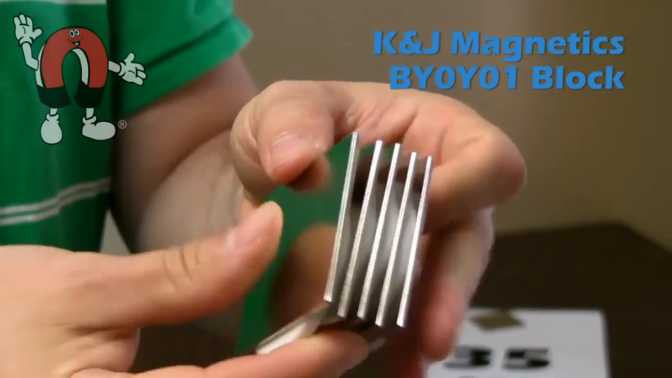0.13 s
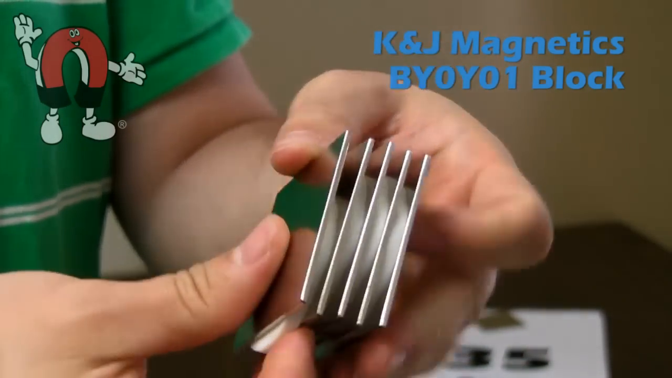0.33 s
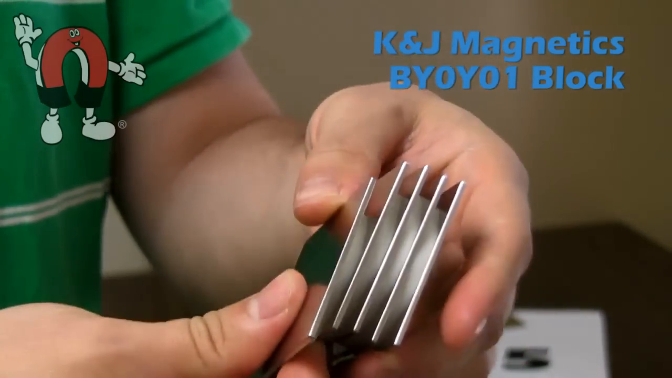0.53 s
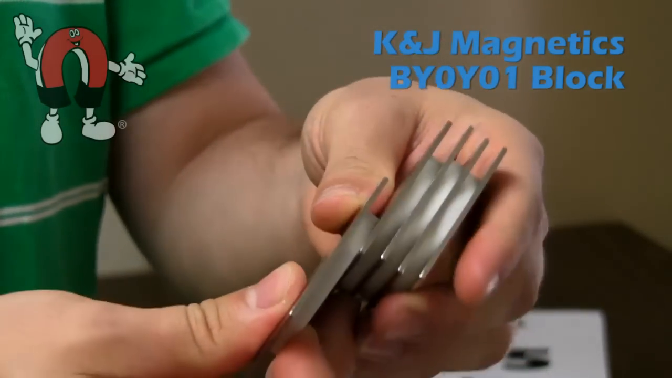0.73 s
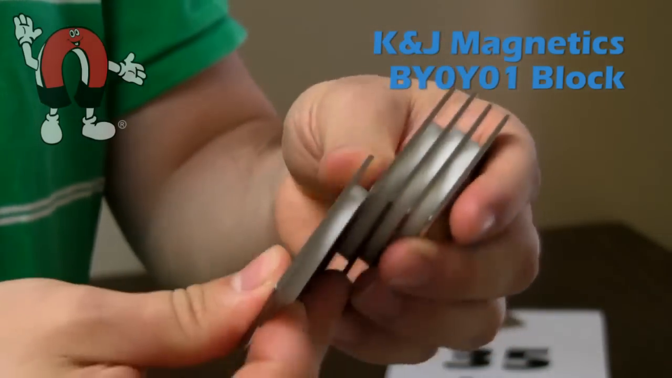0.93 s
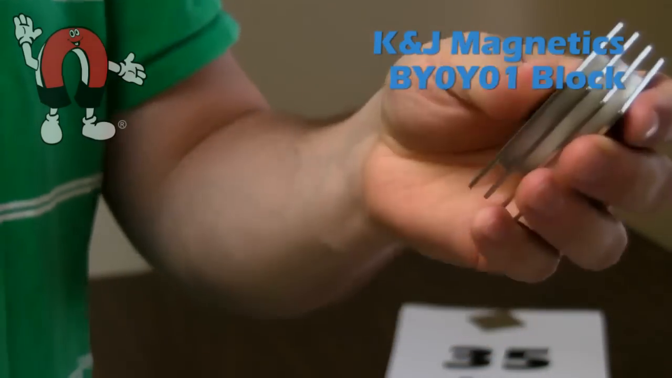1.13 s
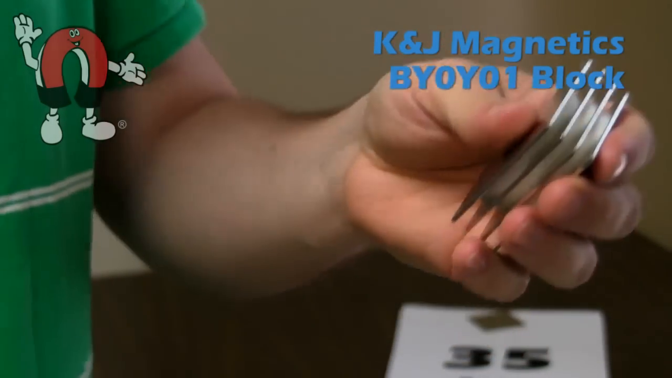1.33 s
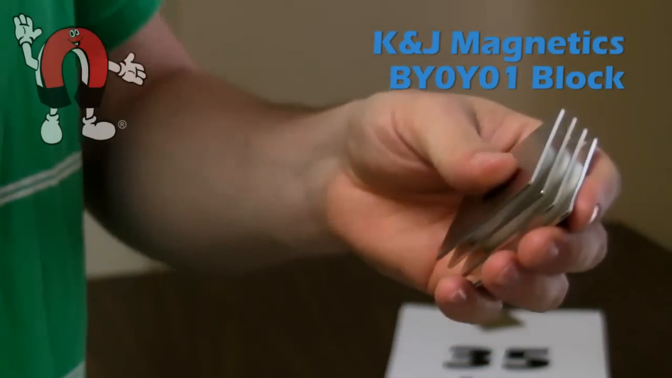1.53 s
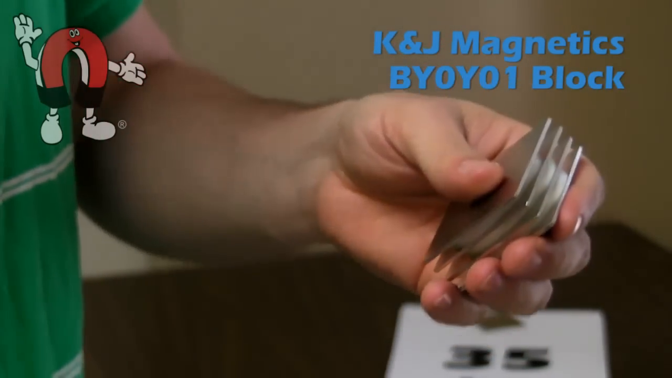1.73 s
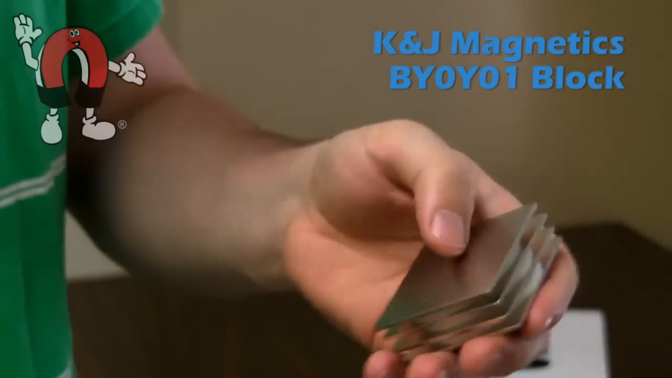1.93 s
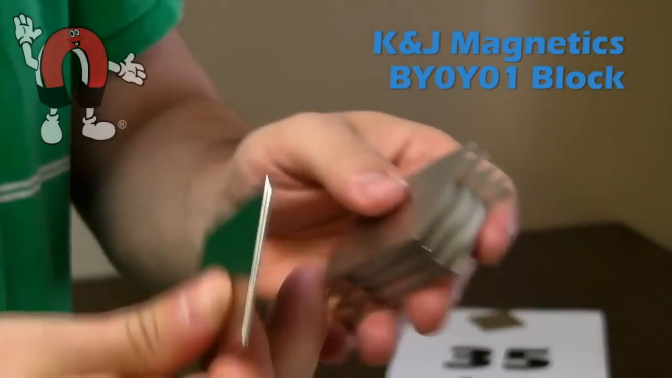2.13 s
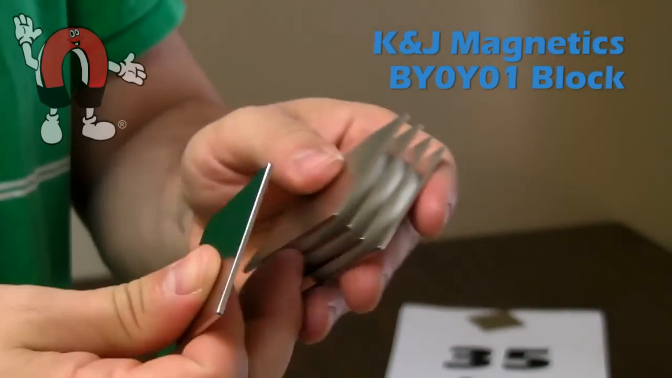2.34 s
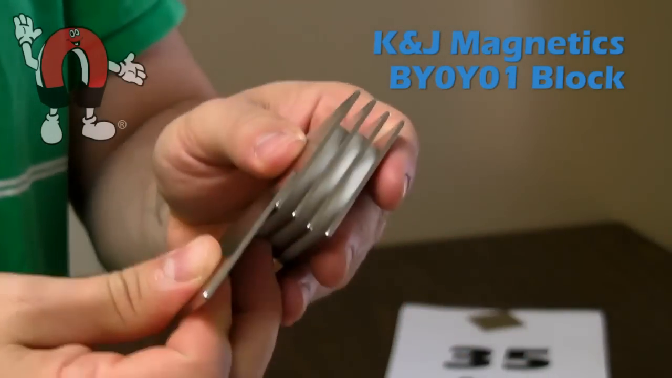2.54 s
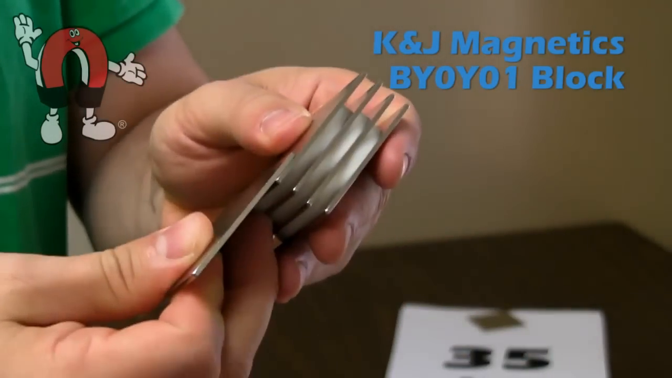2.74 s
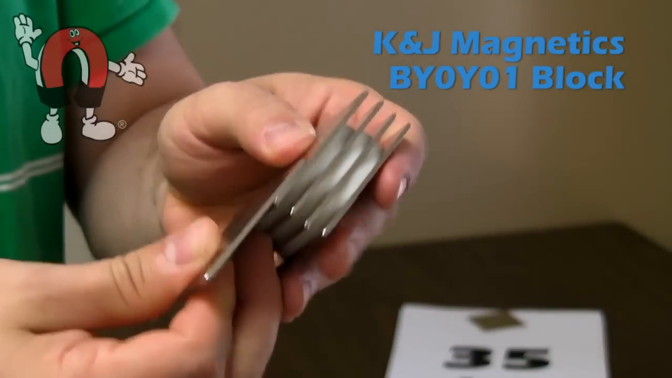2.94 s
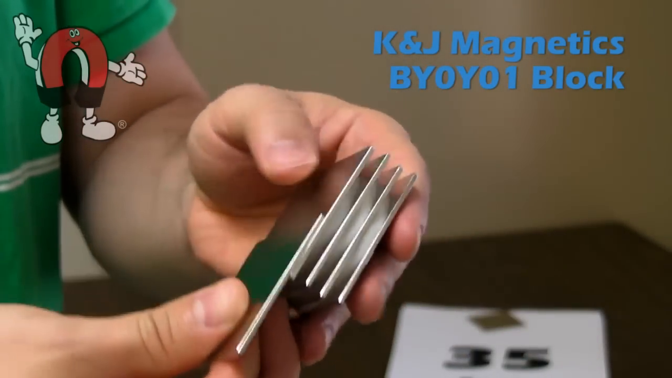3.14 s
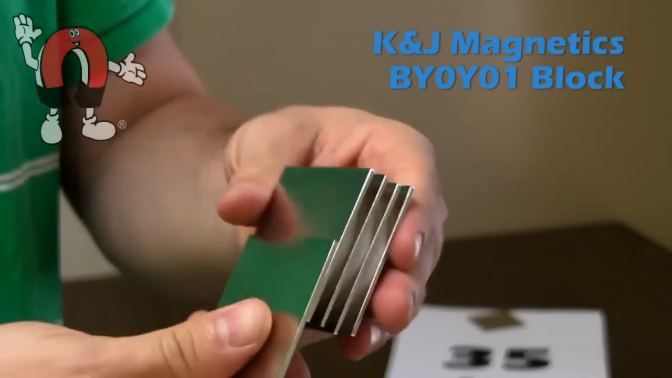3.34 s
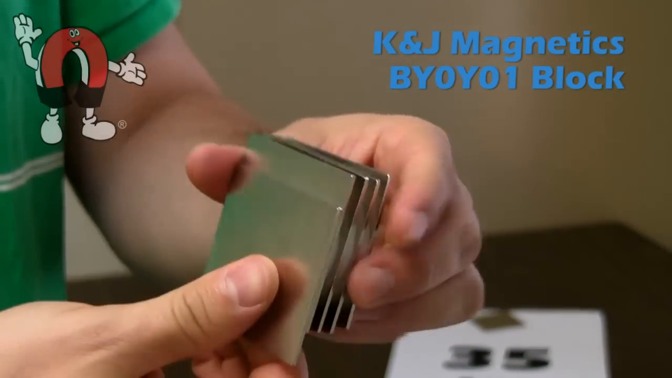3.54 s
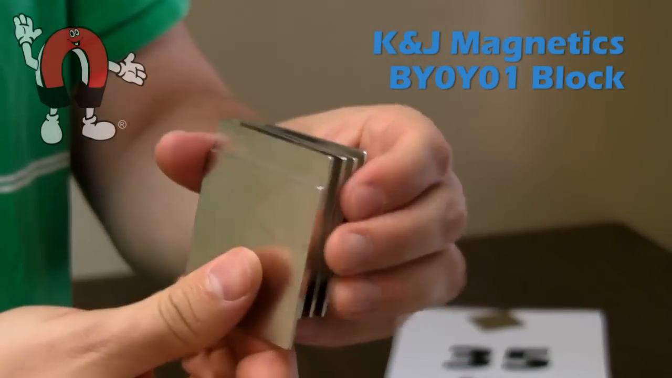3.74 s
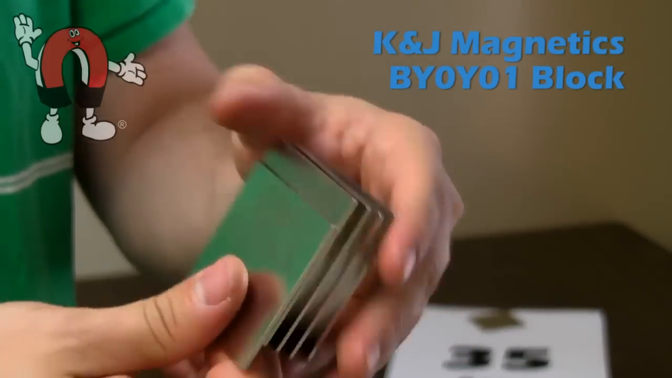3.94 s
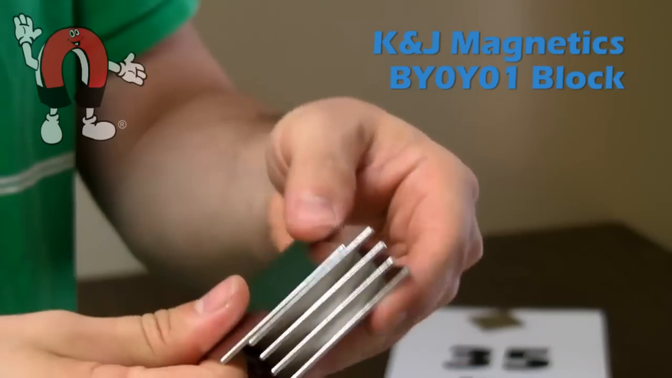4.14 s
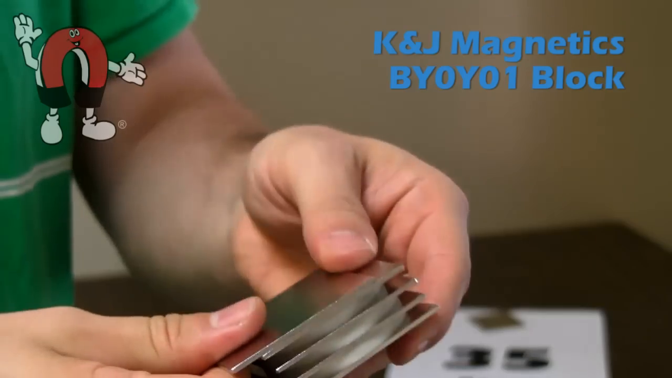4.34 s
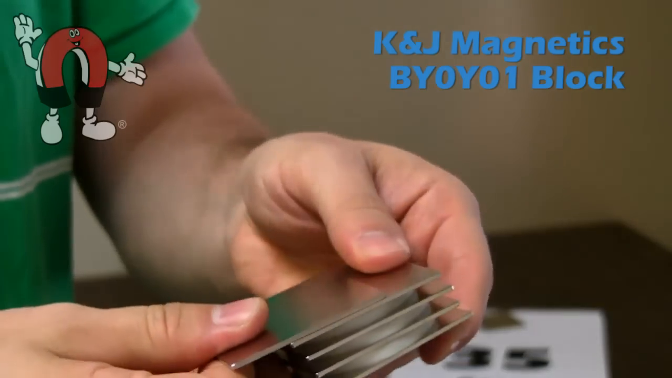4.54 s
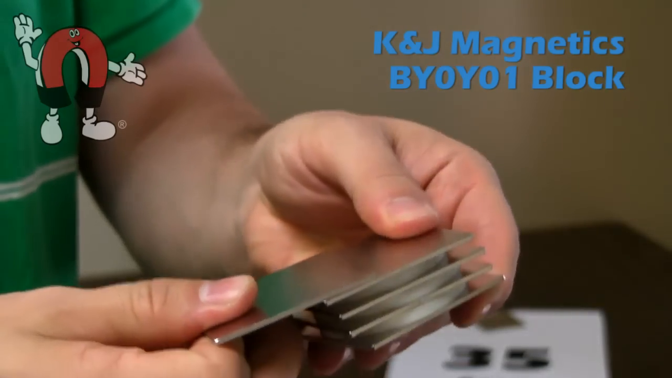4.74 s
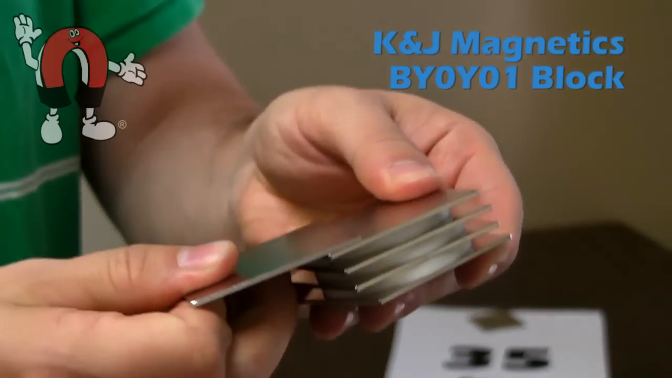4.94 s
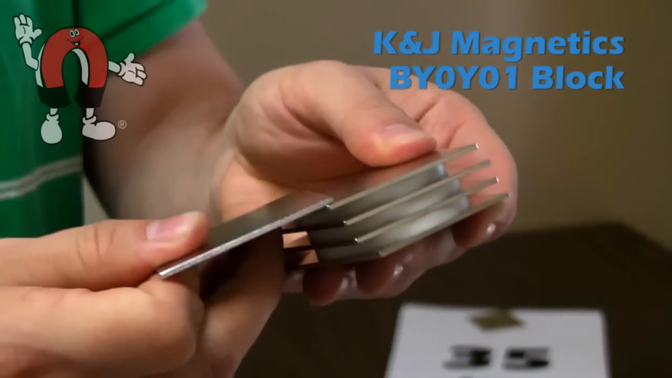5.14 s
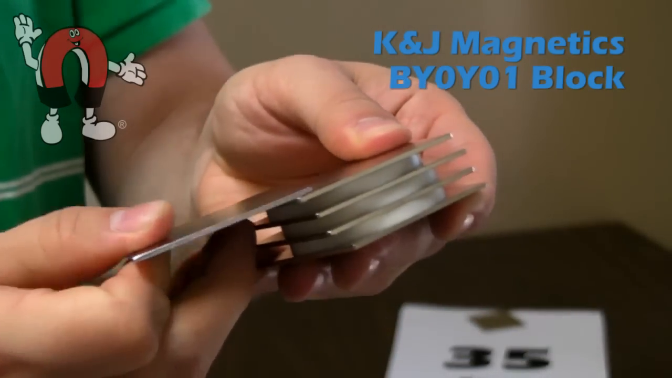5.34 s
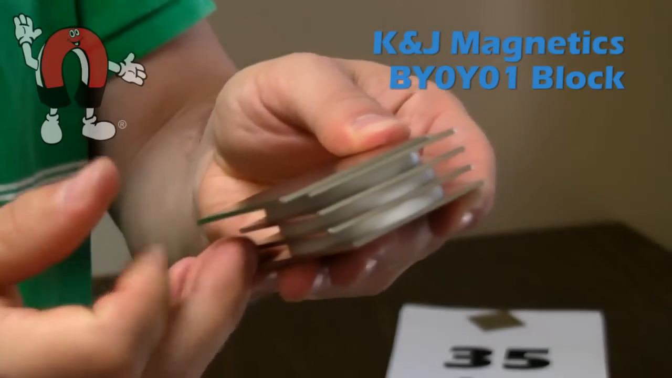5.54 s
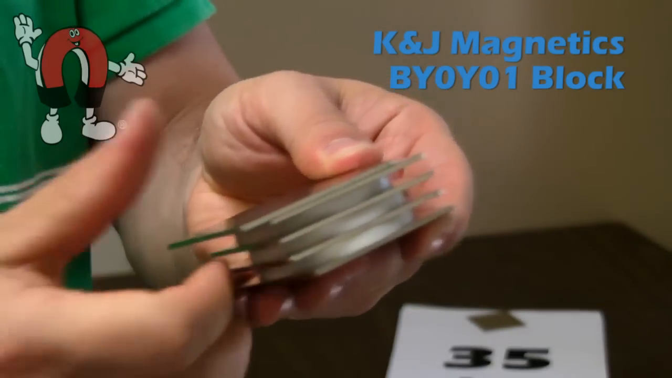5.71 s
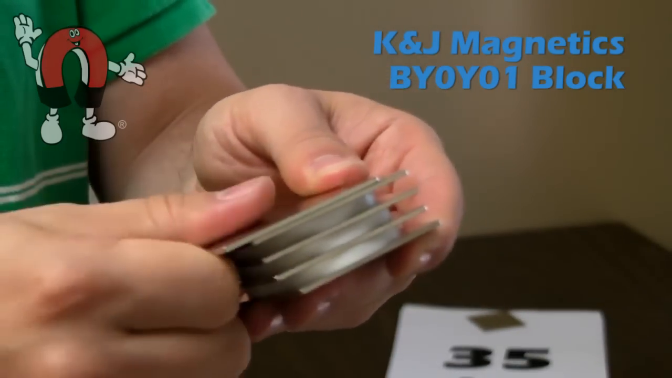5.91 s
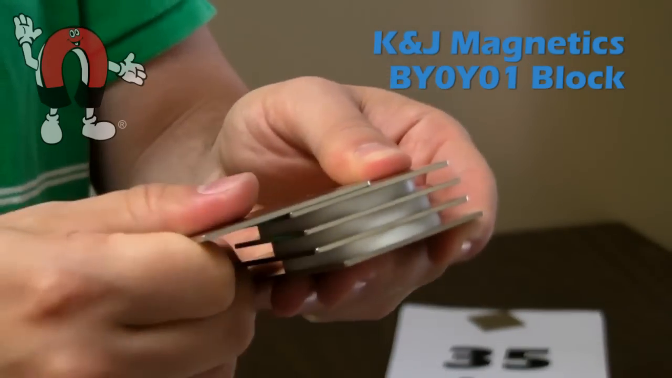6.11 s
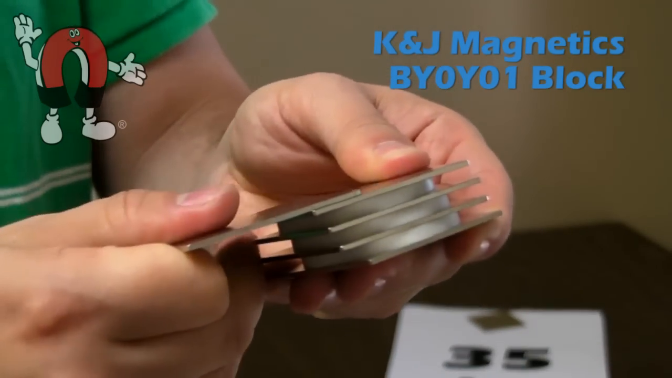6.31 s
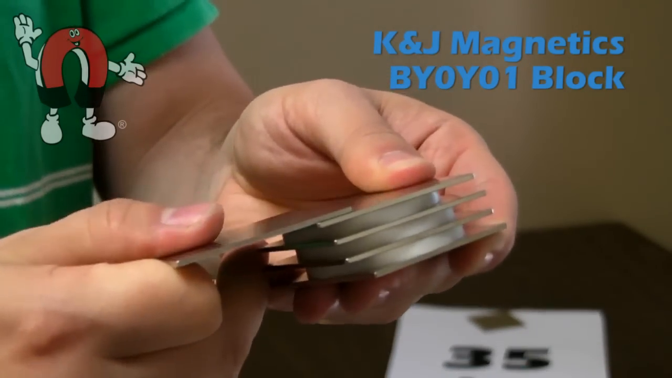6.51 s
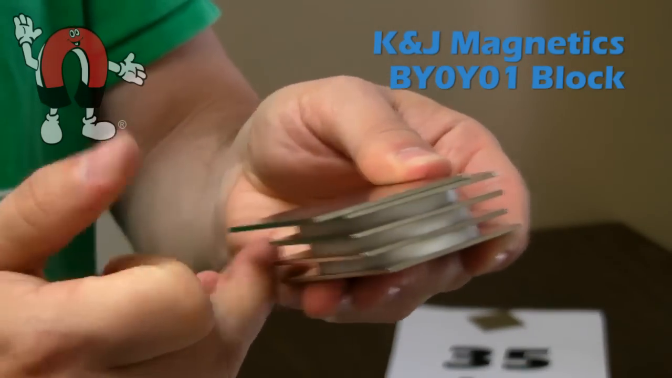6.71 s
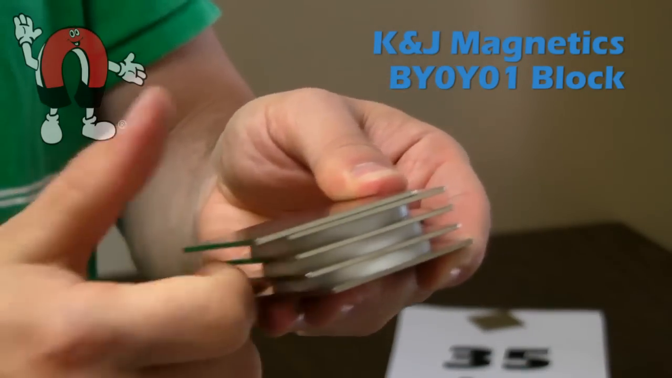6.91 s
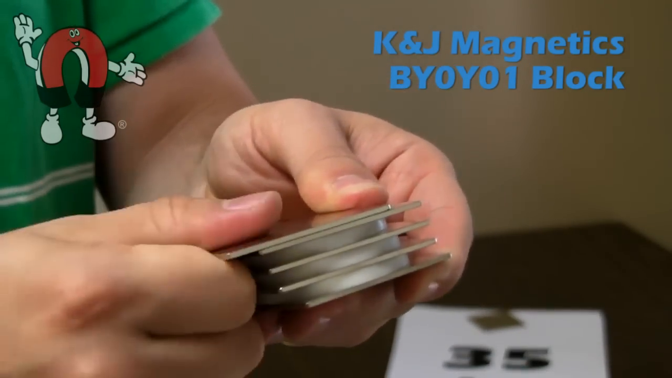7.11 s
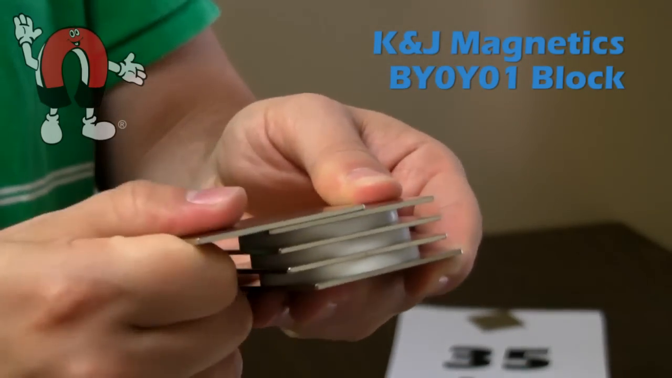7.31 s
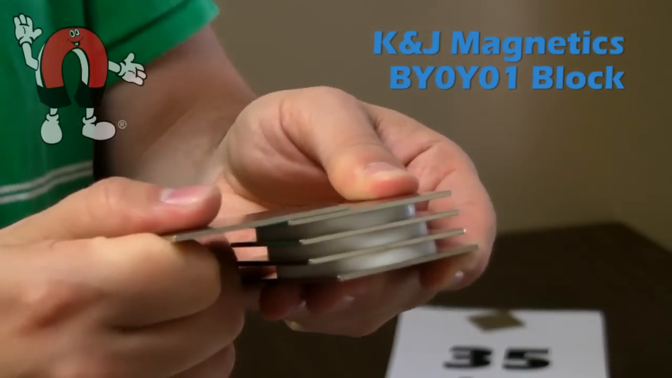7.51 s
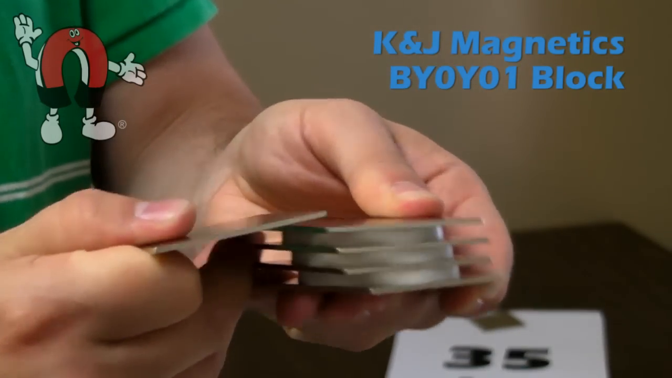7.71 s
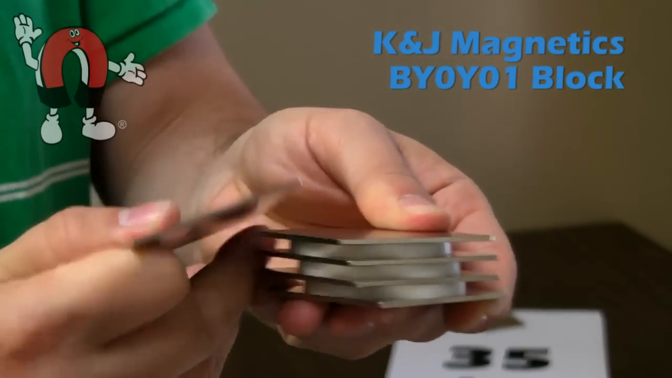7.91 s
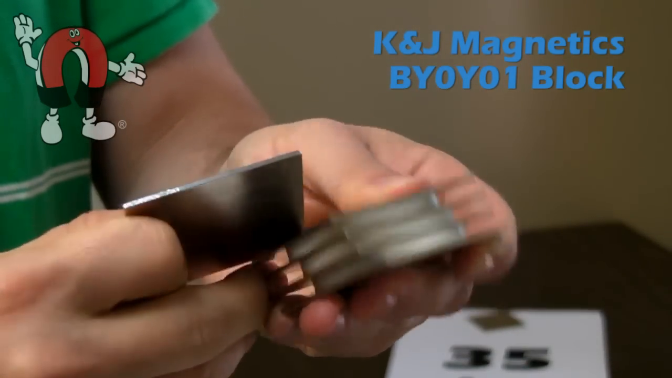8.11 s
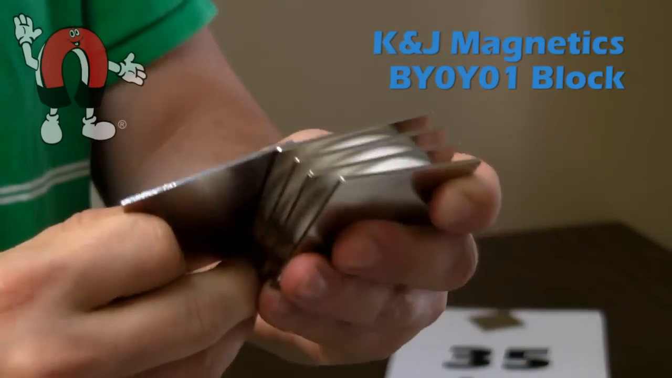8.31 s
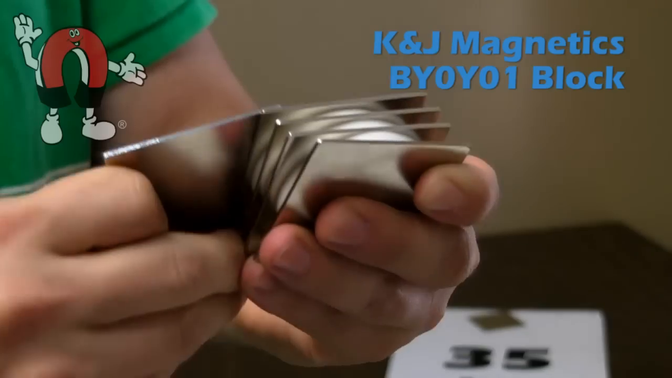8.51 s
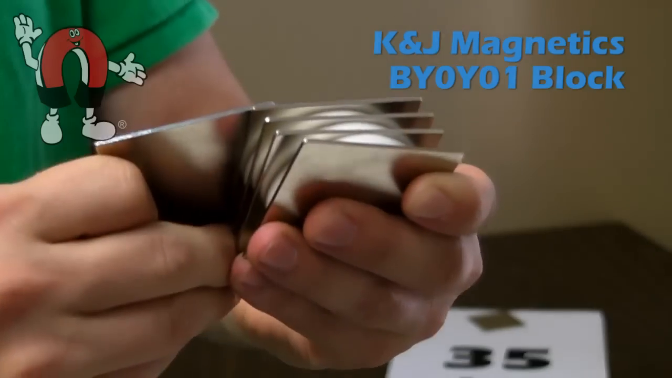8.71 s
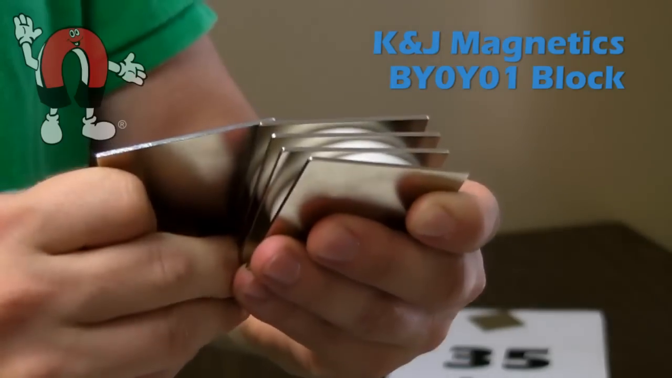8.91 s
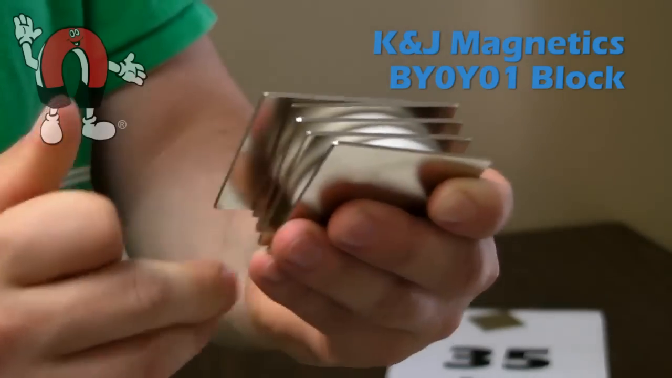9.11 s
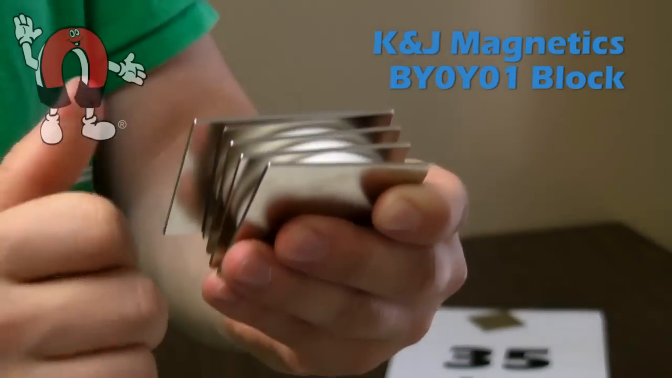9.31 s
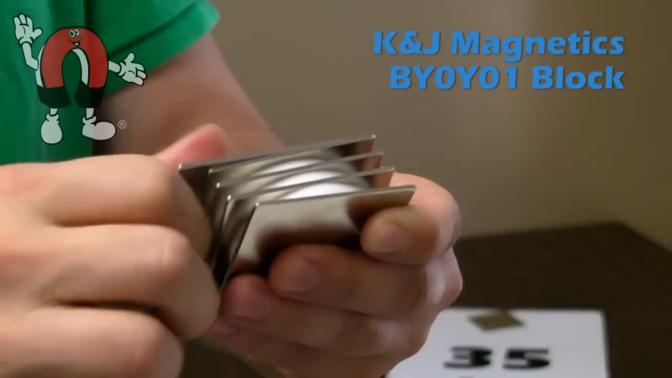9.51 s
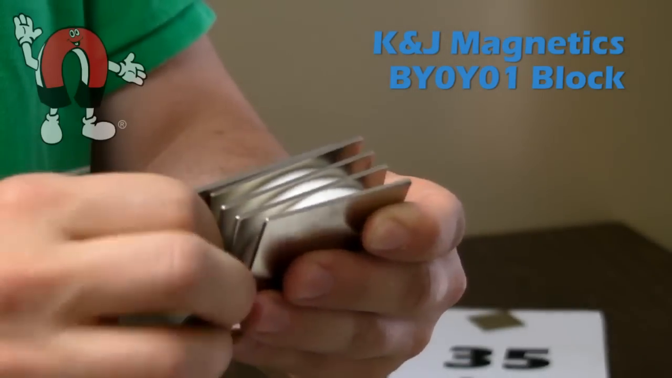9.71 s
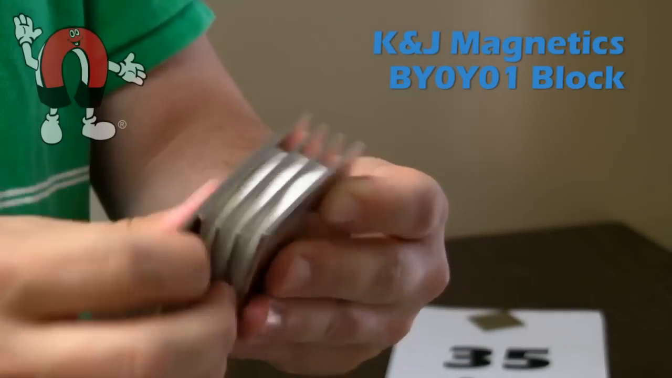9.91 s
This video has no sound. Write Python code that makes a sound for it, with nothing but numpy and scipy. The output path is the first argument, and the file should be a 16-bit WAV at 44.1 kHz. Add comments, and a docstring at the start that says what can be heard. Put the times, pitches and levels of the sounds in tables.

```python
"""Ventilation rumble, mains hum and an even hiss, shaped noise and wavering sines, last throughout.
Over them thin steel plates slide off a hand-held magnet: noise swishes of tiny slips, some squeaking.
Two dull knocks of damped modes come early, faint rubs and ticks here and there; plates snap back on in chatter.
Three soft sagging bumps, louder slides whose edges jump off, two more snaps, another loud slide and a last
faint swish follow. A small, dry room answers steel and knocks with early reflections and a weaker tail."""
import sys
import numpy as np
from scipy import signal
from scipy.fft import rfft, irfft, next_fast_len
from scipy.io import wavfile
from scipy.ndimage import uniform_filter1d, map_coordinates

SR = 44100
rng = np.random.default_rng(int(sys.argv[2]) if len(sys.argv) > 2 else 0)


def file_out(sig):
    """Save sig as 16-bit WAV at sys.argv[1]."""
    # one column per channel
    cols = np.atleast_2d(sig).T
    # limit, then scale
    lim = np.clip(cols, -1, 1)
    pcm = np.round(lim * 32767).astype(np.int16)
    wavfile.write(sys.argv[1], SR, pcm)


N = 438794

# plates sliding: top band's peak t/s, level before band trims/dB, brightness/dB, rise from 6 dB down/s
SLIDES = [(.693, -44, 0, .02), (1.421, -45.8, 12, .015), (1.642, -48.5, 6, .02), (2.025, -56, 16, .02),
          (2.512, -32, 4, .016), (2.68, -50, -1.5, .09), (3.0, -48.5, -2.5, .025), (3.496, -51.5, 6, .026),
          (3.552, -35.5, 11, .013), (4.518, -50, 6, .028), (4.686, -43, 7.5, .03), (4.878, -54.5, 1, .024),
          (5.064, -47, 0, .023), (5.453, -24, 21, .018), (6.085, -35.5, 10, .018), (6.693, -25, 20.5, .016),
          (7.256, -41.5, 6, .022), (7.756, -40, 4, .03), (9.089, -23, 23.5, .0155), (9.893, -59, 8, .024)]
# colours of the steel contact, four bands from body through ring and rasp to edge: f/Hz, relative level/dB
CONTACT_BANDS = [
    [(150, -42), (350, -17.5), (700, -6.5), (1100, -5.5), (1600, 0), (2000, 2), (2450, -3), (3500, -43.5)],
    [(600, -56.5), (1500, -21.5), (2300, -11), (2800, -2.5), (3450, 2), (4200, -8.5), (8000, -44.5)],
    [(1200, -51), (3200, -19.5), (4400, -4), (6300, -3), (7200, -7.5), (8500, -9), (12000, -23.5)],
    [(1500, -58), (6500, -22.5), (8500, -2.5), (10500, 3), (13500, 4), (15500, -2)],
]
# left-right correlation of each contact band, from body to edge
CONTACT_ALIKE = [0.8, 0.944, 0.73, 0.72]
RELEASE_ABOVE_DB = -30  # slides above this level run off the magnet's edge


def amp(db):
    """Logarithmic level: decibels to amplitude gain."""
    return 10 ** (np.asarray(db) / 20)


def unit(x):
    """Power normalisation: x at rms 1."""
    return x / np.sqrt(np.mean(x ** 2) + 1e-20)


def along(points, hz):
    """Logarithmic frequency scale: (f/Hz, value) points interpolated at hz."""
    f, v = np.transpose(points)
    return np.interp(np.log(hz + 1), np.log(f + 1), v)


def wobble(rate):
    """Slow random modulation: a smooth curve through normal random knots, rate knots a second."""
    knots = rng.standard_normal(int(N * rate / SR) + 4)
    return map_coordinates(knots, [np.arange(N) * rate / SR])


def filtered(x, response):
    """Linear filtering: the spectrum of x times a response of frequency."""
    n = x.shape[-1]
    m = next_fast_len(n + 4096)  # zero padding against wrap-around
    return irfft(rfft(x, m) * response(np.fft.rfftfreq(m, 1 / SR)), m)[..., :n]


def causal(gain, size=2048):
    """Minimum phase: folding the cepstrum gives the quickest impulse response with this gain."""
    cepstrum = irfft(np.log(gain(np.fft.rfftfreq(size, 1 / SR)) + 1e-6))
    cepstrum[1:size // 2] *= 2
    cepstrum[size // 2 + 1:] = 0
    return irfft(np.exp(rfft(cepstrum)))


def add(track, s, sound):
    """Superposition: mix a sound into the track at time s."""
    part = track[..., round(s * SR):][..., :sound.shape[-1]]
    part += sound[..., :part.shape[-1]]


def pair(n, alike):
    """Interchannel correlation: left and right white noise that share a common part."""
    mid, side = rng.standard_normal((2, n))
    turn = np.arccos(np.clip(alike, 0, 1)) / 2
    return np.cos(turn) * mid + np.sin(turn) * np.array([side, -side])


def shares(*relative_db):
    """Division of power: gains of the lower bands and the top band, with a total power of 1."""
    gains = amp([*relative_db, 0])
    return gains / np.linalg.norm(gains)


def steel(band):
    """Resonant transfer: impulse response of one contact band, lifted by the plate's resonances."""
    # the plate's broad resonances: f/Hz, width/Hz, lift/dB
    plate = [(3260, 300, 2), (5700, 700, 1)]

    def lift(hz):
        return sum(db / (1 + (2 * (hz - centre_hz) / width) ** 2) for centre_hz, width, db in plate)

    return causal(lambda hz: amp(along(band, hz) + lift(hz)))


def rush(spectrum):
    """Diffuse noise: steady stereo of rms 1 with this spectrum, most correlated at low frequencies."""
    # left-right likeness over frequency: f/Hz, correlation
    likeness = [(30, 0.52), (100, 0.9), (500, 0.93), (1500, 0.62), (5000, 0.23), (14000, 0.22)]

    def mid_side(hz):
        turn = np.arccos(np.clip(along(likeness, hz), -1, 1)) / 2
        return amp(along(spectrum, hz)) * [np.cos(turn), np.sin(turn)]

    mid, side = filtered(rng.standard_normal((2, N)), mid_side)
    return unit(np.array([mid + side, mid - side]))


def background(rumble_db=-48.5, hiss_db=-62.5, waver_db=2.0, drift_rad=0.58):
    """Stationary noise and line spectra: ventilation rumble, slightly unsteady hum and an even hiss."""
    # spectrum of the ventilation rumble: f/Hz, relative density level/dB
    rumble = [(20, -29), (48, -13.5), (68, -12.5), (115, -1), (175, -1), (205, -11), (245, -9.5),
              (272, -19.5), (330, -10.5), (410, -10), (600, -18.5), (730, -19.5), (1050, -28.5),
              (2500, -40)]
    # spectrum of the hiss: f/Hz, relative density level/dB
    hiss = [(710, -24.5), (1200, 0.5), (1350, -3.5), (1700, -1), (3150, -4), (14500, -9.5), (16000, -27)]
    # hum lines: f/Hz, nominal rms level before waver and balance/dB
    hum_lines = [(119.4, -56.5), (221, -61), (343, -76.5), (522, -72)]
    t = np.arange(N) / SR
    hum = np.zeros(N)
    for hz, db in hum_lines:
        level = np.sqrt(2) * amp(db + waver_db * wobble(3))
        hum += level * np.sin(2 * np.pi * hz * t + drift_rad * wobble(3))
    balance = amp([[-.4], [.4]])
    return (amp(rumble_db) * rush(rumble) + hum) * balance + amp(hiss_db) * rush(hiss)


def scrapes(grit_db=2, jerk_db=1.4, sharpness=1.9, trim_db=(-1.5, -1.3, 0), body_db=-7, lead=(.3, .15, 0)):
    """Stick-slip friction: crowded tiny slips swell into a swish that peaks when the plate moves fastest."""
    fall_over_rise, edge_fall_over_rise = 1.1, .6  # slides stop short at the edge
    rasp_db, rasp_slope = 2.8, .55  # rasp against the top band at brightness 0; its loss per dB of brightness
    t = np.arange(N) / SR
    power = np.zeros((3, N))  # ring, rasp and edge bands
    for s, db, bright_db, rise in [*SLIDES, *rubs()]:
        near = slice(max(round((s - .2) * SR), 0), round((s + .2) * SR))
        # the contact shrinks as the plate slides, so the lower bands peak a little earlier
        u = t[near] - s + rise * np.array(lead)[:, None]
        fall = rise * (edge_fall_over_rise if db > RELEASE_ABOVE_DB else fall_over_rise)
        away = np.abs(u) / np.where(u < 0, rise, fall)
        swell = .5 ** (away ** sharpness)
        # a bright slide loses its ring first, then its rasp
        colour = shares(-bright_db, rasp_db - rasp_slope * bright_db)
        power[:, near] += (amp(db) * colour[:, None] * swell) ** 2
    slips = amp(grit_db * wobble(3000) + jerk_db * wobble(250))
    out = np.zeros((2, N))
    # the low body of the plate follows its ring band
    band_powers, band_trims = [power[0], *power], [body_db, *trim_db]
    for band, alike, p, db in zip(CONTACT_BANDS, CONTACT_ALIKE, band_powers, band_trims):
        rasp = signal.oaconvolve(pair(N, alike) * slips, steel(band)[None], axes=1)[:, :N]
        out += amp(db) * np.sqrt(p) * unit(rasp)
    return out


def squeaks(width_hz=380, settle_s=.02):
    """Friction-driven resonance: short fuzzy squeaks at steady pitches; one climbs and settles."""
    # squeaks: t/s, Gaussian half length/s, settled f/Hz, climb left at the peak/Hz, rms level at the peak/dB
    caught = [(.693, .016, 5300, 0, -51), (.702, .016, 3550, 520, -49.5), (2.997, .013, 4680, 0, -51.5),
              (5.055, .01, 3256, 0, -54), (7.75, .0056, 5750, 0, -42), (7.754, .035, 3250, 0, -53.5)]
    out, t = np.zeros(N), np.arange(-SR // 10, SR // 10) / SR
    for s, half, hz, climb_hz, db in caught:
        noise = rng.standard_normal(len(t))
        drive = unit(filtered(noise, lambda f: 1 / (1 + (f / width_hz) ** 4)))
        # a climb comes from the shortening overhang of the plate
        pitch = np.maximum(hz - climb_hz * np.exp(-t / settle_s), hz / 3)
        tone = np.sqrt(2) * np.sin(2 * np.pi * np.cumsum(pitch) / SR)
        add(out, s + t[0], amp(db) * np.exp(-(t / half) ** 2 / 2) * drive * tone)
    return out


def rubs(scatter=.2, scatter_db=1.5):
    """Light sliding friction: faint, dull slides at loose intervals while the fingers shift the plates."""
    # spells of shifting: start t/s, end t/s, mean level of a rub before band trims/dB
    fidgets = [(.97, 1.27, -59), (6.2, 6.42, -56.5), (7.39, 7.66, -58)]
    gap_s, rise_s, bright_db = .09, .026, -1
    rows = []
    for start, end, db in fidgets:
        times = np.arange(start + gap_s / 2, end, gap_s)
        for s, (shift, size) in zip(times, rng.standard_normal((len(times), 2))):
            rows.append((s + scatter * gap_s * shift, db + scatter_db * size, bright_db, rise_s))
    return rows


def ticks(table, band_db, t60, level_db):
    """Light impact: exponentially dying noise, coloured by the contact bands, makes single steel cracks."""
    out, t = np.zeros((2, N)), np.arange(SR // 20) / SR
    colour = sum(amp(db) * steel(band) for band, db in zip(CONTACT_BANDS, band_db))
    for s, db in table:
        crack = unit(signal.fftconvolve(pair(len(t), .8), colour[None], axes=1)[:, :len(t)])
        add(out, s, amp(db + level_db - 60 * t / t60) * crack)
    return out


def knocks(sag=600):
    """Damped modes: dull wooden knocks, and soft low bumps whose pitch sags (Hz/s) as they swell and fade."""
    # dull knocks: t/s, gain on the summed modes/dB
    blows = [(1.6685, -23), (1.690, -16.8)]
    # modes of a knock: f/Hz, relative level/dB, t60/s
    wood = [(378, -7.5, 0.056), (512, -2, 0.031), (840, -1.5, 0.017), (935, 1, .019), (990, -12.5, 0.014)]
    # soft bumps: centre t/s, f at the centre/Hz, peak level/dB, half length to 1/e/s
    bumps = [(3.761, 378, -43, 0.03), (3.863, 382, -51, 0.014), (4.149, 392, -46, 0.028)]
    contact_s, echo_s, echo_db = .0011, .013, -20  # build-up; reflection from a near surface
    out, t = np.zeros(N), np.arange(SR // 4) / SR
    modes = sum(amp(level - 60 * t / t60) * np.sin(2 * np.pi * hz * t) for hz, level, t60 in wood)
    knock = modes * (1 - np.exp(-(t / contact_s) ** 2))
    for s, db in blows:
        add(out, s, amp(db) * knock)
        add(out, s + echo_s, amp(db + echo_db) * knock)
    u = t - t.mean()
    for s, hz, db, half in bumps:
        swell = np.exp(-(u / half) ** 2)
        add(out, s - t.mean(), amp(db) * swell * np.sin(2 * np.pi * (hz * u - sag * u ** 2 / 2)))
    return np.array([out, out])


def chatter(t60, alike, size=2048):
    """Impulsive excitation: dying noise with a flattened spectrum, starting a quarter of the way in."""
    t = (np.arange(size) - size // 4) / SR
    z = rfft(pair(size, alike) * amp(-60 * np.abs(t) / t60) * (t >= 0))
    power = uniform_filter1d(np.mean(np.abs(z) ** 2, axis=0), size=9)
    return irfft(z / np.sqrt(np.abs(power) + 1e-12)), t[0]


def snaps(left_db=.4, build_s=0.000498, count=3):
    """Repeated impact: a plate hits the magnet and bounces ever faster while its free end rings in modes."""
    # snaps: t/s, level of the energy packed into 1 ms before balance/dB, then body/dB, ring/dB and clack/dB
    # against the top band, first flight/s, level change per bounce/dB, gain on the free end's modes/dB
    hits = [(2.4896, -8.2, -16.5, -5, -10, .0031, -2.2, -31),
            (2.5265, -7.8, -12.5, -6.5, -.5, .0011, -3.2, -42),
            (8.1287, -8.4, -15, -1, -3.5, .0022, -4.5, -8.3),
            (8.3621, -8, -13.5, -14, -4, .0022, -10.5, -36)]
    # modes of the free end: f/Hz, relative level/dB, t60/s
    free_end = [(3310, -1.5, 0.02), (3150, -27, .018), (3300, -34.5, 0.27), (3500, -33.5, .32),
                (6300, 2, .009), (6600, -1, .007)]
    contact_t60_s = .0033  # chatter of the first contact
    flight_shrink, rattle_flights = .6, 4.2  # flight over the one before; t60 of a bounce in first flights
    out, t = np.zeros((2, N)), np.arange(SR // 3) / SR
    colours = [steel(band) for band in CONTACT_BANDS]
    ring = sum(amp(level - 60 * t / t60) * np.sin(2 * np.pi * hz * t) for hz, level, t60 in free_end)
    for s, db, body_db, ring_db, clack_db, flight, bounce_db, free_db in hits:
        add(out, s, amp(free_db) * ring * (1 - np.exp(-t / build_s)))
        gains = shares(body_db, ring_db, clack_db)
        for k in range(count):
            delay = flight * sum(flight_shrink ** j for j in range(k))
            t60 = rattle_flights * flight if k else contact_t60_s
            for colour, share, alike in zip(colours, gains, CONTACT_ALIKE):
                impacts, lead = chatter(t60, alike)
                burst = signal.fftconvolve(impacts, colour[None], axes=1)
                energy = np.sum(burst ** 2) / 2 / (SR / 1000)  # per channel, against 1 ms at rms 1
                add(out, s + delay + lead, amp(db + k * bounce_db) * share * burst / np.sqrt(energy))
    return out * amp([[left_db], [-left_db]])


def edge_jumps():
    """Sudden release: near the peak of each loud slide the plate's last edge catches and jumps off."""
    # catches of the edge: delay from the slide's peak t/s, level against the slide before the common trim/dB
    catches = [(-.002, 8), (.0045, 10.5)]
    rows = []
    for s, db, *_ in SLIDES:
        if db > RELEASE_ABOVE_DB:
            rows += [(s + delay, db + catch_db) for delay, catch_db in catches]
    return rows


def room(x, alike, early_db, late_db, early_t60=0.16):
    """Reverberation: table and near walls answer quickly; a weaker tail lingers, wider in the treble."""
    # decay of the late tail: f/Hz, t60/s
    decay = [(300, .3), (1000, 0.25), (2000, 0.69), (3300, 0.56), (6000, 0.57), (15000, 0.41)]
    n = SR * 3 // 5
    t = np.arange(n) / SR
    hz, frames, z = signal.stft(pair(n, alike), SR, nperseg=256)
    fading = z * amp(-60 * frames / along(decay, hz)[:, None])
    late = signal.istft(fading, SR, nperseg=256)[1][:, :n]
    early = pair(n, alike) * amp(-60 * t / early_t60)
    arrival = 1 - np.exp(-(t / .004) ** 2)
    tail = (amp(early_db) * unit(early * arrival) + amp(late_db) * unit(late * arrival)) / np.sqrt(n)
    # the two microphones are close together, so long waves reach both alike
    mid = tail.mean(axis=0)
    tail = mid + filtered(tail - mid, lambda f: np.clip(f / 5000, 0, 1))
    return x + signal.fftconvolve(x, tail, axes=1)[:, :N]


def scene():
    """Direct-to-reverberant ratio: the steel is close; the knocks come from farther off."""
    # light touches of steel: t/s, peak level before the common trim/dB
    light_touches = [(1.6661, -22), (1.688, -25), (1.9135, -45), (2.2288, -41.5), (5.8103, -46),
                     (7.9309, -44.5)]
    touches = ticks(light_touches, band_db=(1.5, 0, 1.5, -8), t60=0.048, level_db=-9)
    releases = ticks(edge_jumps(), band_db=(-20, -19, -10, -3), t60=0.015, level_db=-5.5)
    slides = room(scrapes() + squeaks() + releases, alike=0.084, early_db=-7, late_db=-15)
    thuds = room(knocks(), alike=0.28, early_db=-4, late_db=-6)
    hits = room(snaps() + touches, alike=.1, early_db=-6.0, late_db=-12.5)
    return background() + slides + thuds + hits


def record(dry):
    """Clipping and band limiting: peaks are cut at full scale, then a steep low-pass removes the top."""
    top_hz = 16300
    return filtered(np.clip(dry, -1, 1), lambda hz: 1 / np.sqrt(1 + (hz / top_hz) ** 200))


dry = scene()
out = record(dry)
file_out(out)
```